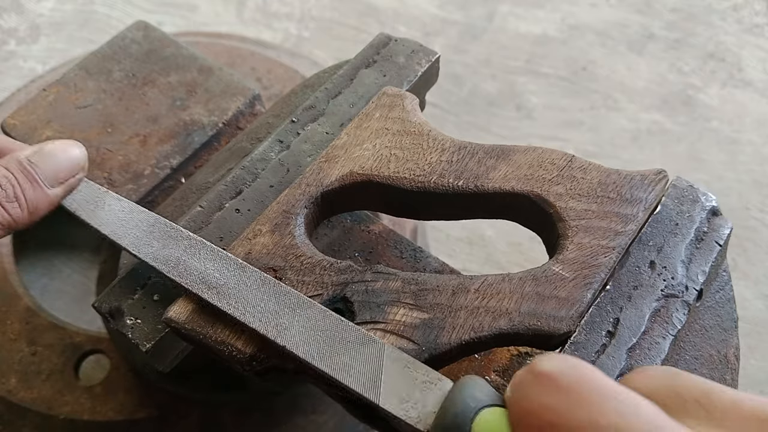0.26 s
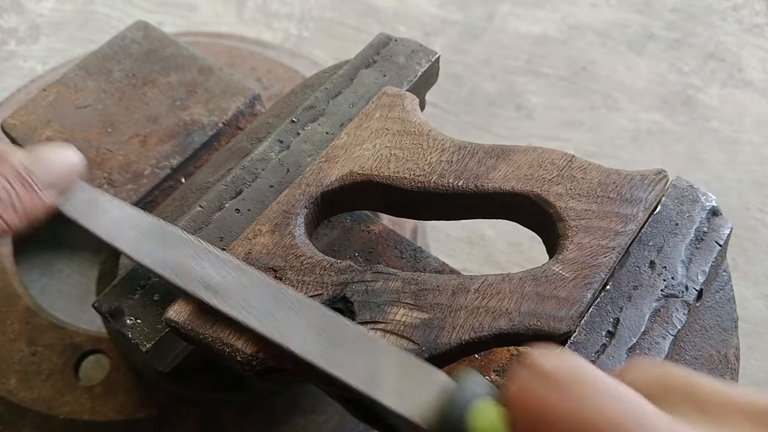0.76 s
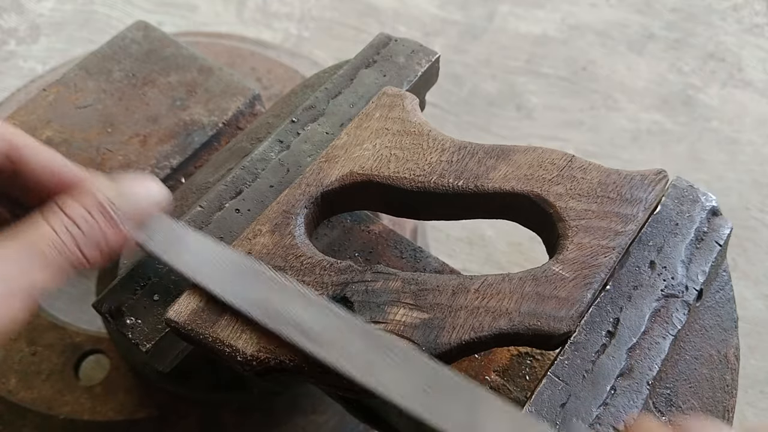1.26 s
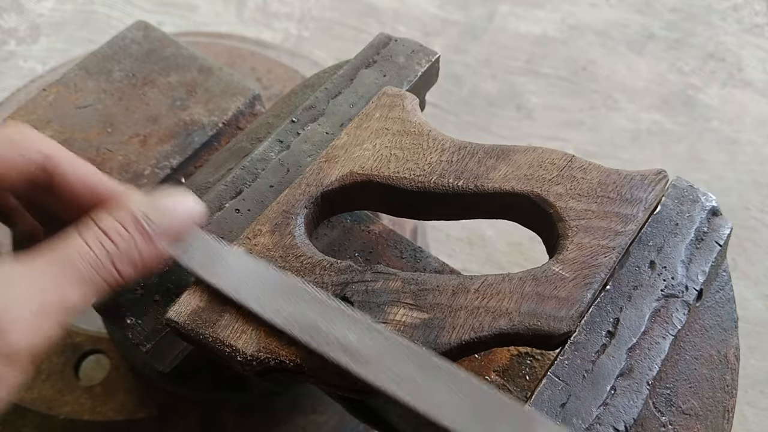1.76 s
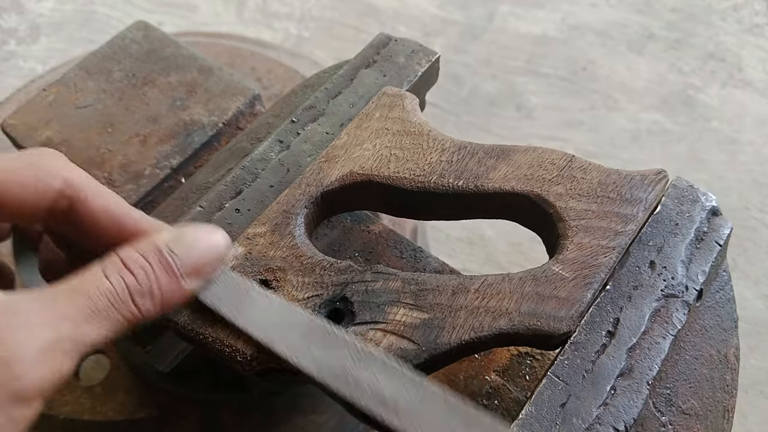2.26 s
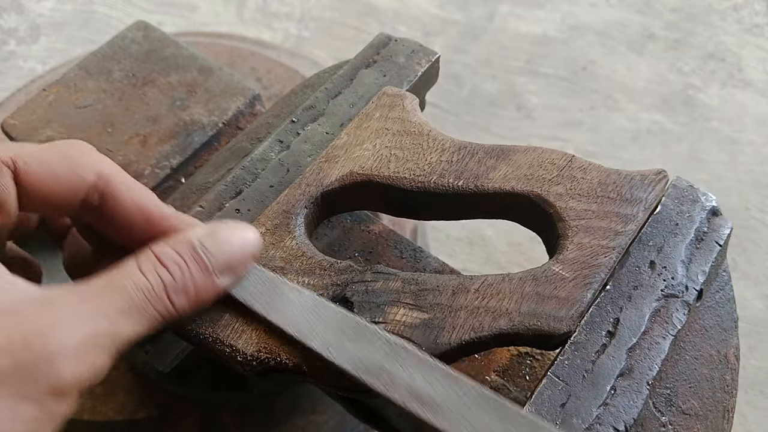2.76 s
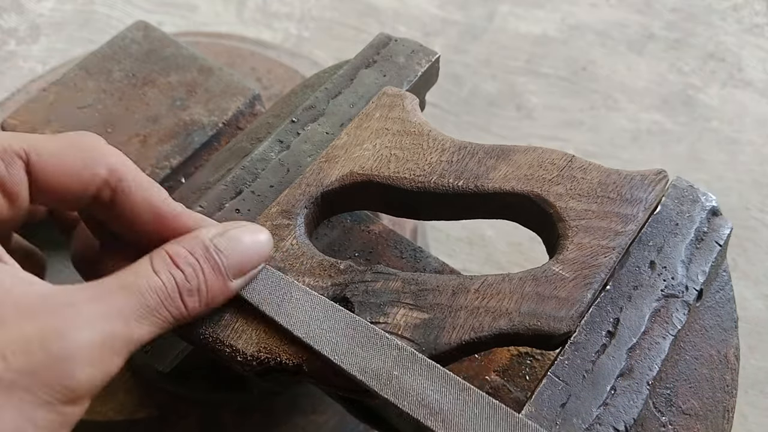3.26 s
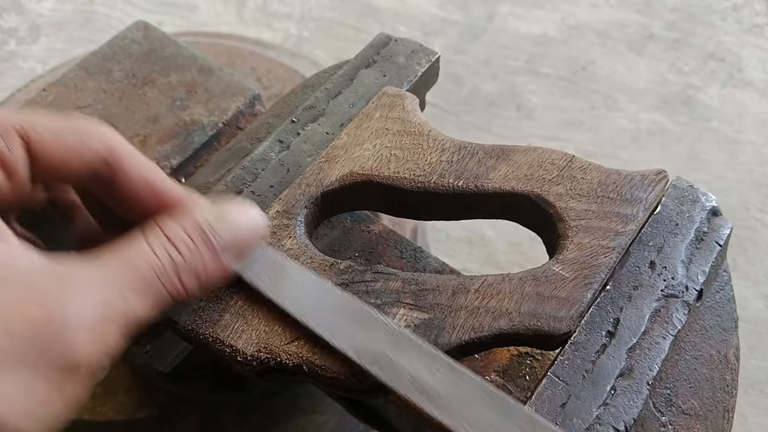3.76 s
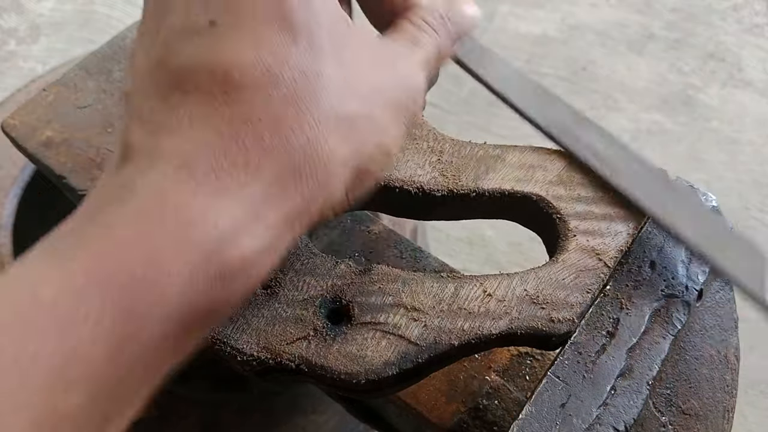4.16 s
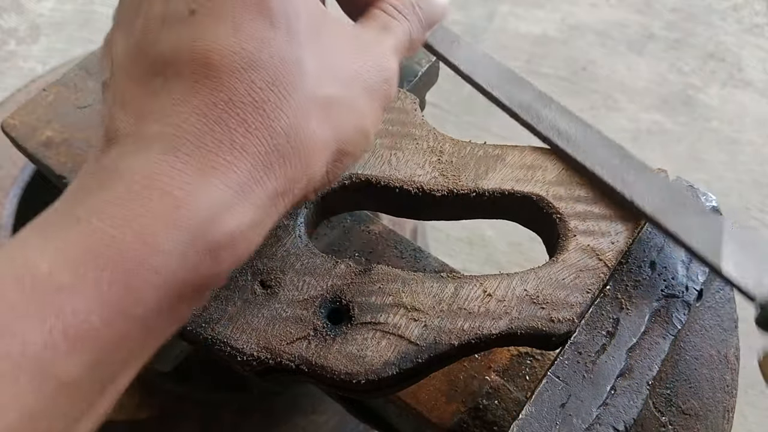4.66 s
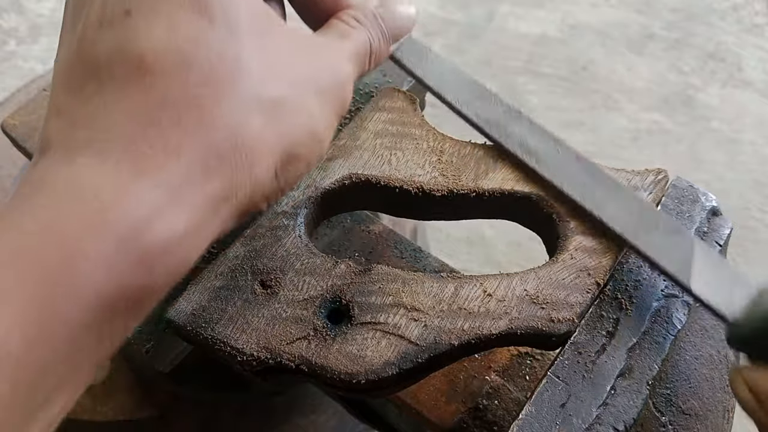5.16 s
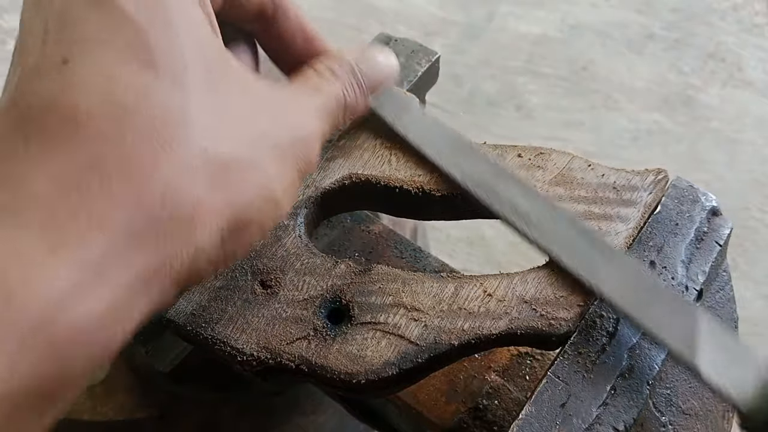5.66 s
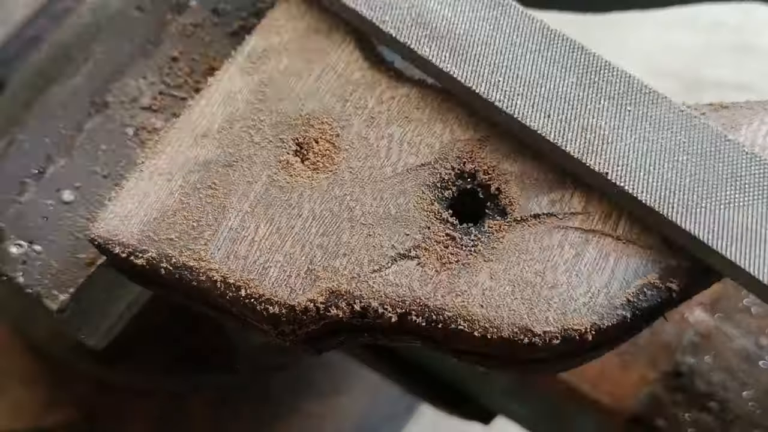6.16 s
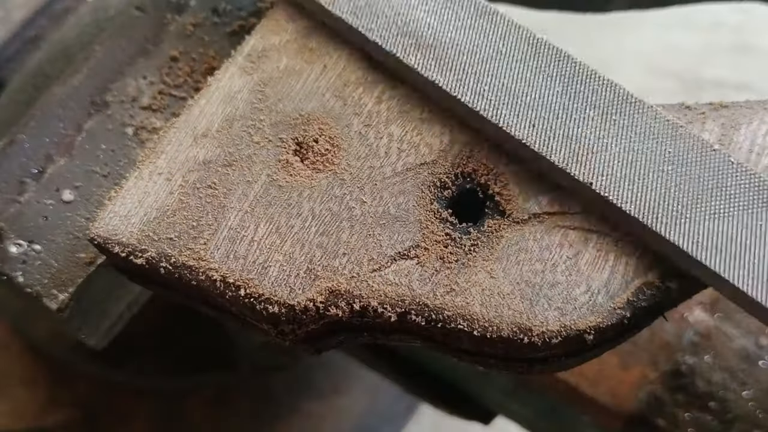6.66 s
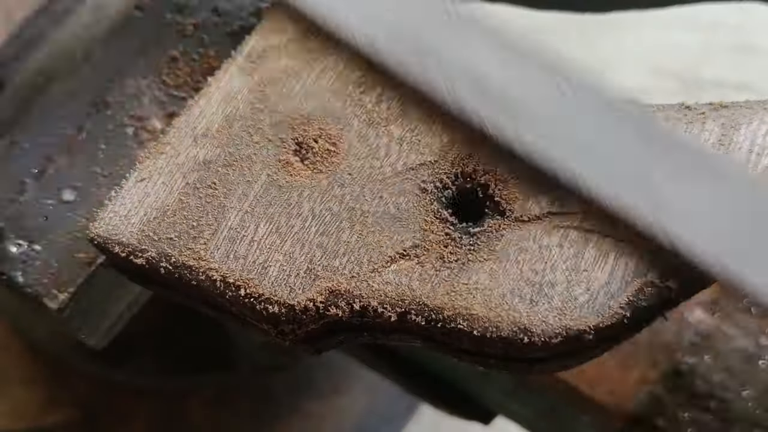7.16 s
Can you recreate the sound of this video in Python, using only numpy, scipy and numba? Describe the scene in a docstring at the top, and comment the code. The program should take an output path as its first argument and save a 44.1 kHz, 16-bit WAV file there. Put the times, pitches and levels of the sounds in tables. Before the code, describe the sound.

In a quiet workshop, a steel file scrapes to and fro over a wooden handle in a vice, about three or four strokes a second. Hollow, woody rasps with small tooth clicks and faint vice groans come first; then the strokes turn softer and uneven with dull thuds. Finally a close-up brings brighter, slower rasping over a deep throbbing hum.

```python
"""In a workshop, a flat steel file rasps to and fro over an old wooden handle clamped in a vice, at three spots.
Dense catches of its teeth and smooth rubbing excite the modes of wood and file; one favoured tone slides.
The vice groans as a noise-driven resonance, the bench hums and thuds in a low noise band, and air hisses softly.
At the last spot the deep hum grows and part of it becomes an engine-like throb, a sum of harmonics."""
import sys
import numpy as np
from scipy import signal
from scipy.fft import rfft, irfft, next_fast_len
from scipy.io import wavfile
from numba import njit

SR = 44100
rng = np.random.default_rng(int(sys.argv[2]) if len(sys.argv) > 2 else 0)


def generate_wav(signal):
    """Clip the signal to [-1, 1] and save it as 16-bit WAV at the path in sys.argv[1]."""
    frames = np.transpose(np.atleast_2d(signal))
    scaled = np.clip(frames, -1, 1) * 32767
    pcm = np.round(scaled).astype(np.int16)
    wavfile.write(sys.argv[1], SR, pcm)


N = 326781
T = np.arange(N) / SR
SIZE = next_fast_len(N + SR)   # padded transform length
HZ = np.maximum(np.arange(SIZE // 2 + 1) * SR / SIZE, 1)

# moments when the file moves to another part of the handle: time_s
SPOT_CHANGE_S = [4.45, 6.35]
SPOT = np.searchsorted(SPOT_CHANGE_S, T)   # 0, 1 or 2 at each sample


def amp(db):
    """Decibel law: a level in dB becomes an amplitude ratio."""
    return 10 ** (np.asarray(db) / 20)


def rms_one(x):
    """Power normalization: scale to a root mean square of 1."""
    return x / np.sqrt(np.mean(np.abs(x) ** 2) + 1e-20)


def in_time(rows):
    """Linear interpolation: each column after the time column becomes a curve over all samples."""
    s, *columns = np.transpose(rows)
    return [np.interp(T, s, column) for column in columns]


def at_hz(points):
    """Spectral envelope: dB interpolated over log frequency, as gain on the frequency grid."""
    hz, level_db = np.transpose(points)
    return amp(np.interp(np.log(HZ), np.log(hz), level_db))


def causal(gain):
    """Minimum phase by folding the cepstrum: nothing rings before its cause."""
    cepstrum = irfft(np.log(gain + 1e-7), SIZE)
    cepstrum[1:SIZE // 2] *= 2
    cepstrum[SIZE // 2 + 1:] = 0
    return np.exp(rfft(cepstrum))


def through(x, response):
    """Linear filtering as a product of spectra; white noise of rms 1 leaves with rms 1."""
    return irfft(rfft(x, SIZE) * rms_one(response), SIZE)[:N]


def band(x, low_hz, high_hz):
    """Band limitation: a steep band-pass, brought to rms 1."""
    sos = signal.butter(3, [low_hz, high_hz], "band", fs=SR, output="sos")
    return rms_one(signal.sosfilt(sos, x))


def drift(rate_hz):
    """Low-pass random modulation: two equal poles at the given rate leave slow noise of rms 1."""
    step = 16   # samples between draws
    pole = np.exp(-2 * np.pi * rate_hz * step / SR)
    noise = rng.standard_normal(N // step + 3002)
    slow = signal.lfilter([1], [1, -2 * pole, pole * pole], noise)[3000:]   # settled part
    return np.interp(np.arange(N) / step, np.arange(len(slow)), rms_one(slow))


@njit
def sliding_resonance(x, hz, width_hz, sr):
    """A damped second-order resonator whose centre frequency moves sample by sample."""
    out = np.zeros(len(x))
    r = np.exp(-np.pi * width_hz / sr)
    for i in range(2, len(x)):
        feedback = 2 * r * np.cos(2 * np.pi * hz[i] / sr) * out[i - 1] - r * r * out[i - 2]
        out[i] = x[i] - x[i - 2] + feedback
    return out * np.sqrt((1 - r * r) / 2)


def swells(rows):
    """Addition of powers: smooth raised-cosine swells, summed as power."""
    power = 0
    for middle, length, peak_db, *_ in rows:
        phase = np.pi * np.clip((T - middle) / length, -.5, .5)
        power = power + (amp(peak_db) * np.cos(phase) ** 2) ** 2
    return power


def strokes():
    """Speed-dependent friction: drive sizes of deep wood, wood, file and dust, and the favoured tone."""
    # strokes, pushes and pulls in turn: start_s, fastest_s, end_s, file_level_db,
    # then relative to the file: deep_wood_db, wood_db, dust_db; favoured tone: early_hz, late_hz
    stroke_rows = [(-0.104, 0.068, 0.192, -46.5, -5, 10.5, -6, 1300, 1180),
                   (0.188, 0.316, 0.44, -47.5, -3, 4, 0.5, 1100, 1400),
                   (0.423, 0.618, 0.74, -51, 0.3, 8, -3, 1030, 1160),
                   (0.751, 0.847, 1.02, -47.5, -3, 3.5, -0.3, 1180, 1360),
                   (0.97, 1.145, 1.288, -45.5, -6, 7, -6.4, 1180, 1360),
                   (1.248, 1.398, 1.533, -46.0, -3.5, 3.5, -2.5, 1200, 1250),
                   (1.507, 1.702, 1.832, -48, -7, 8.9, -6.5, 1090, 1360),
                   (1.793, 1.935, 2.077, -45, -7, 0.5, -5, 1250, 1245),
                   (2.063, 2.251, 2.34, -47, -7.5, 7, -5.5, 1100.0, 1290),
                   (2.357, 2.496, 2.624, -46.5, -5, 2.3, -7.5, 1340, 1165),
                   (2.619, 2.789, 2.89, -48, -1.2, 7.5, -5.5, 1260, 1200),
                   (2.864, 3.014, 3.166, -46.5, -7.5, 2.7, -7, 1230, 1480),
                   (3.161, 3.319, 3.453, -47, -6.5, 6, -7.5, 1190, 1300),
                   (3.448, 3.537, 3.7, -46, -6, 1.5, -6.0, 1235, 1250),
                   (3.693, 3.866, 3.98, -48.5, -5, 6, -6.5, 1060, 1300),
                   (3.968, 4.057, 4.243, -48, -4.6, -0.5, -5.5, 1280, 960),
                   (4.242, 4.327, 4.466, -55.5, -3.5, 5.5, -6, 1360, 1410),
                   (4.448, 4.55, 4.733, -54.5, -6, 9, -1.5, 1250, 1090),
                   (4.701, 4.964, 5.09, -67.5, -7.5, 1.5, -0.2, 1410, 1220),
                   (5.068, 5.158, 5.31, -55.5, -5.5, 7, -4.5, 1329, 1280),
                   (5.28, 5.406, 5.54, -60, -9, 2.5, -3.5, 1170, 1310),
                   (5.508, 5.646, 5.75, -54, -2.5, 4, -5.5, 1290, 1290),
                   (5.7, 5.868, 6.003, -65.5, -5.5, 5, -2, 1160.0, 1222),
                   (5.985, 6.093, 6.223, -53, -8, 5, -4.5, 1300, 1060),
                   (6.173, 6.467, 6.606, -52, -10.5, -4, -6.5, 1429, 1190),
                   (6.552, 6.727, 6.853, -46, -12.5, -4.5, -7, 1100, 1390),
                   (6.81, 7.014, 7.14, -52, -16, -4.5, -5.5, 1320, 1120.0),
                   (7.104, 7.253, 7.423, -46.5, -10.5, -4, -7, 1180, 1440.0)]
    # swelling with speed, rows deep wood, wood, file, dust: rounding at top speed, power of speed,
    # drag_db relative to the drag at the turns
    speed_laws = [(2.2, 2.94, -1), (1.68, 3.26, -2.2), (1.633, 3.14, 1.1), (2.03, 3.74, -1)]
    # drag that remains at the turns, by spot: level_db
    rest_db = [-76.5, -89.5, -80.5]
    # change from start to end, by spot and for push then pull: deep_wood_db, wood_db, dust_db
    lean_db = [
        [(-16, -4.5, -3), (13, 0.5, 4.5)],
        [(12, 9, -7), (15, 2, 6)],
        [(5, 3, 8), (14, -4, 1)],
    ]

    rounding, steepness, drag_db = np.transpose(speed_laws)[:, :, None]
    power = amp(drag_db + np.array(rest_db)[SPOT]) ** 2
    leaning = []
    for k, (start, fastest, end, level_db, *colour_db, early_hz, late_hz) in enumerate(stroke_rows):
        span = slice(max(round(start * SR), 0), round(end * SR))
        rise = (T[span] - start) / (fastest - start)
        fall = (end - T[span]) / (end - fastest)
        way = np.clip(np.minimum(rise, fall), 0, 1)
        speed = 1 - (1 - way) ** rounding
        power[:, span] += (amp(level_db) * speed ** steepness) ** 2
        lean = np.array(lean_db[np.searchsorted(SPOT_CHANGE_S, fastest)][k % 2])
        # the lean and the slide are set at one quarter and three quarters of the stroke
        leaning.append(((3 * start + end) / 4, *(colour_db - lean / 4), early_hz))
        leaning.append(((start + 3 * end) / 4, *(colour_db + lean / 4), late_hz))
    deep_db, wood_db, dust_db, slide_hz = in_time(leaning)
    return np.sqrt(power) * amp([deep_db, wood_db, 0 * T, dust_db]), slide_hz


def teeth():
    """Impulsive and continuous friction: random equal catches under smooth rubbing, the grip wavering."""
    catches_per_s, smooth_share = 2500.0, 0.96   # the share is of power
    signs = rng.choice([-1, 1], N)
    catches = rms_one(signs * (rng.random(N) < catches_per_s / SR))
    smooth = rng.standard_normal(N)
    rub = np.sqrt(smooth_share) * smooth + np.sqrt(1 - smooth_share) * catches
    grip_db = 0.5 * drift(31.5) + 0.5 * drift(170.0)
    return rms_one(rub * amp(grip_db))


def patchy(force):
    """Band-wise modulation: the grain of the wood favours now one range of tones, now another."""
    patch_db, patch_rate_hz = 3, 15.2
    edges_hz = np.geomspace(450, 17000, 27)
    out = np.zeros(N)
    for k, pair in enumerate(zip(edges_hz, edges_hz[1:])):
        sos = signal.butter(2, pair, "band", fs=SR, output="sos")
        gain = (-1) ** k * amp(patch_db * drift(patch_rate_hz))   # neighbours in opposite sign
        out += gain * signal.sosfilt(sos, force)
    return rms_one(out)


def sheen(dust):
    """Spectral tilt in time: the top treble of the dust is split off and varied in level."""
    # level of the top treble: time_s, level_db
    sheen_rows = [(0.0, 2.5), (0.8, -0.5), (1.6, -4), (4.3, -2), (4.7, 0), (5.3, -0.5), (6.3, 0.5),
                  (7.4, -1)]
    sheen_from_hz = 12800
    body = signal.sosfiltfilt(signal.butter(3, sheen_from_hz, fs=SR, output="sos"), dust)
    return body + amp(in_time(sheen_rows)[0]) * (dust - body)


def tooth_bites():
    """Impulse excitation: single hard bites of a tooth."""
    # bites, strength ahead of the resonances: time_s, impulse_db
    bite_rows = [(0.027, -51), (0.081, -28.5), (0.535, -37), (1.113, -60), (1.61, -36), (1.939, -41),
                 (2.398, -36.5), (2.747, -21.5), (2.958, -25), (3.845, -25), (4.517, -53.5), (6.614, -54)]
    bites = np.zeros(N)
    for s, impulse_db in bite_rows:
        bites[round(s * SR)] = amp(impulse_db)
    return bites


def favour(force, slide_hz):
    """Position-dependent modal excitation: the point of contact decides which wood tones are driven hardest."""
    slide_width_hz, slide_db = 180.0, 18.0
    evening_db = -9.5   # takes back the loudness the favoured tone adds
    tone = sliding_resonance(force, slide_hz, slide_width_hz, SR) * np.sqrt(slide_width_hz / SR)
    return amp(evening_db) * (force + amp(slide_db) * tone)


def work_response(spot):
    """Modal superposition: powers of resonances and broad colour add into one causal response."""
    # resonances of wood and file, levels relative:
    # centre_hz, width_hz (6 dB down), spot_1_db, spot_2_db, spot_3_db
    mode_rows = [(594, 53, -9.5, -15, -18), (730, 25, -28, -41, -25), (811, 26, 5, 4, 7),
                 (991, 45, -2, -15, -7), (1010, 36, -23, -10, -9), (1089, 23, -7.5, -81, -2),
                 (1182, 23, -2, -2.5, -0.5), (1240, 98, -11.5, -45, -11.5), (1349.7, 16.5, -4, -42, -11),
                 (1443, 14, -36.5, 2, -7.5), (1635, 35, -19, -22, -17), (2050, 150, -8, -10, 0),
                 (2195, 118, -1.5, 0, -25), (2325, 31, -3, -36.5, -7), (2514, 130, -21, -9, 4.5),
                 (2475, 55, -4, -27, 5), (2697, 17, -5, -7, 0), (2872, 130, -30, -4, -28),
                 (3157, 44, -27, -5.5, -6), (6970, 120, -58, -16, -11), (10560, 1040, -17.5, -7, -3.5)]
    # broad colour between the resonances, one list per spot, levels relative: frequency_hz, density_db
    colour_lists = [
        [(260, -50), (450, -29), (587, -15.5), (691, -26), (802, -0.5), (876, -7), (1200, -9.5), (1470, -19.5),
         (2230, -8.5), (3970, -17), (4670, -32), (6860, -20.5), (9230, -26), (10700, -19), (15500, -29.5)],
        [(260, -2.5), (450, -15.5), (596, 1.5), (681, -16), (802, -0.5), (1080, -20.5), (1160, -10), (1430, 0),
         (1780, -7), (2950, -8.5), (4880, -29), (5750, -13.5), (9230, -14), (10400, -54), (15500, -15.5)],
        [(260, -34), (450, -13.5), (712, -29), (790, -16), (863, -9.5), (1200, -20.5), (1760, -13), (2470, -6),
         (2740, -14), (3270, -9.5), (4600, -30.5), (6970, -10.5), (9230, -23), (10400, -23), (15500, -20)],
    ]
    # broad colour against the resonances, by spot: gain_db
    colour_gain_db = [0.5, -3, 3]
    narrowest_hz = 26   # the hand on the file damps every mode at least this much
    power = (amp(colour_gain_db[spot]) * at_hz(colour_lists[spot])) ** 2
    for hz, width_hz, *level_db in mode_rows:
        detuning = 2 * (HZ - hz) / max(width_hz, narrowest_hz)
        power = power + amp(level_db[spot]) ** 2 / (1 + detuning ** 2) ** 2
    return causal(np.sqrt(power))


def rasp(sizes, slide_hz):
    """Source and filter: rubbing and bites drive the resonances of the spot being filed."""
    # borders between deep wood, wood, file and dust: frequency_hz
    split_hz = [900, 1750, 4800]
    deep, wood, steel, dust = patchy(teeth()) * sizes
    bites = tooth_bites()   # blunt blows: they reach wood and file, not the dust
    drives = [deep + bites * sizes[0] / sizes[2],
              favour(wood + bites * sizes[1] / sizes[2], slide_hz),
              steel + bites,
              sheen(dust)]
    part = np.searchsorted(split_hz, HZ)
    out = np.zeros(N)
    for spot in range(3):
        response = work_response(spot)
        for p, drive in enumerate(drives):
            out += through(drive * (SPOT == spot), response * (part == p))
    return out


def groaning(stroke, hum_db):
    """Addition of powers: the vice's groan swells over a faint share of the stroke, with its pitch."""
    # groans now and then: middle_s, length_s, peak_db, pitch_hz
    groan_rows = [(0.01, 0.14, -61.5, 242), (0.327, 0.27, -72, 298), (0.557, 0.13, -64, 214),
                  (0.867, 0.25, -72.5, 308), (0.954, 0.086, -69, 307), (1.108, .2, -64.5, 220),
                  (1.392, 0.45, -73, 310), (1.958, 0.11, -68, 301), (2.429, 0.1, -69.5, 302),
                  (2.55, 0.16, -68.5, 312), (2.889, 0.079, -68.5, 257), (2.993, 0.29, -66, 320),
                  (3.116, 0.11, -58.5, 273), (3.812, 0.22, -64, 223), (3.96, 0.14, -70.5, 244),
                  (4.114, 0.34, -72.5, 292), (4.32, .1, -71, 241.8)]
    # share that follows the stroke, relative to the file, by spot: level_db
    under_db = [-32.5, -31, -16]
    late_db, late_hz = -8.5, 227.4   # last spot: steady pitch, this level against the deep hum is added
    power = (stroke * amp(under_db)[SPOT]) ** 2
    power = power + (SPOT == 2) * amp(hum_db + late_db) ** 2
    pitch_hz, = in_time([(middle, hz) for middle, _, _, hz in groan_rows])
    return np.sqrt(power + swells(groan_rows)), np.where(SPOT == 2, late_hz, pitch_hz)


def vice(stroke, hum_db):
    """Resonance under noise excitation: a rumble drives a narrow groan of moving pitch."""
    groan_size, groan_hz = groaning(stroke, hum_db)
    rumble = band(rng.standard_normal(N), 142.0, 560.0) * amp(2.1 * drift(21.0))
    return groan_size * rms_one(sliding_resonance(rumble, groan_hz, 45.0, SR))   # width in Hz


def engine_throb():
    """Harmonic synthesis: multiples of one wavering rate, each drifting in level."""
    # partials, levels relative: multiple of the rate, level_db
    order_rows = [(3, -12), (4, 0), (5, 2.5), (6, 3), (7, -7.5), (8, -15), (9, -4), (12, -13)]
    mean_rate_hz = 18.15
    turns = np.cumsum(mean_rate_hz * (1 + .006 * drift(2))) / SR
    throb = np.zeros(N)
    for multiple, level_db in order_rows:
        partial = np.sin(2 * np.pi * (multiple * turns + rng.random()))
        throb += amp(level_db + 3.1 * drift(1.72)) * partial
    return rms_one(throb)


def bench(hum_db):
    """Power-shared mixture: low noise hums and thuds; late on, a throb takes part of its power."""
    # thuds under the hands: middle_s, length_s, peak_db
    thud_rows = [(0.1, 0.1, -68.5), (1.67, .06, -73), (3.8, 0.16, -86), (4.56, .12, -65.5),
                 (5.06, 0.11, -79), (5.2, 0.22, -64), (5.47, 0.1, -64), (5.66, 0.13, -66),
                 (5.91, 0.058, -84), (6.05, 0.066, -77)]
    throb_from_s, throb_share = 6.3, .45
    share = throb_share * (T > throb_from_s)
    lumps = band(rng.standard_normal(N), 95.0, 149.3) * amp(3.0 * drift(5.7))
    hum = np.sqrt(share) * engine_throb() + np.sqrt(1 - share) * lumps_normalized(lumps)
    return np.sqrt(amp(hum_db) ** 2 + swells(thud_rows)) * hum


def lumps_normalized(lumps):
    """Power normalization of the lumpy low noise, so that its share of the hum is a share of power."""
    return rms_one(lumps)


def workshop_air():
    """Stationary coloured noise: still air, its level set by spot."""
    # spectral shape, levels relative: frequency_hz, density_db
    air_points = [(15, -18), (40, 4.5), (130, -3), (300, -2.5), (800, -2.5), (1300, -31), (4800, -43),
                  (10500, -17), (15500, -31)]
    # level of the air by spot: level_db
    air_db = [-80.5, -83, -78]
    return amp(air_db)[SPOT] * through(rng.standard_normal(N), at_hz(air_points))


def scene():
    """Linear superposition of file on wood, vice, bench and still air."""
    # deep hum of the bench: time_s, level_db
    hum_rows = [(0.0, -80), (0.7, -87), (1.1, -80), (1.6, -93.5), (3.6, -88.5), (4.4, -83), (4.6, -77.5),
                (5.5, -81.5), (6.25, -83), (6.384, -54), (7.41, -50)]
    hum_db, = in_time(hum_rows)
    sizes, slide_hz = strokes()
    out = rasp(sizes, slide_hz) + vice(sizes[2], hum_db) + bench(hum_db) + workshop_air()
    return out[None]


def record(dry):
    """Band limitation: an elliptic low-pass cuts the top steeply."""
    cutoff_hz = 15450
    return signal.sosfilt(signal.ellip(12, .5, 70, cutoff_hz, fs=SR, output="sos"), dry)


dry = scene()
out = record(dry)
generate_wav(out)
```